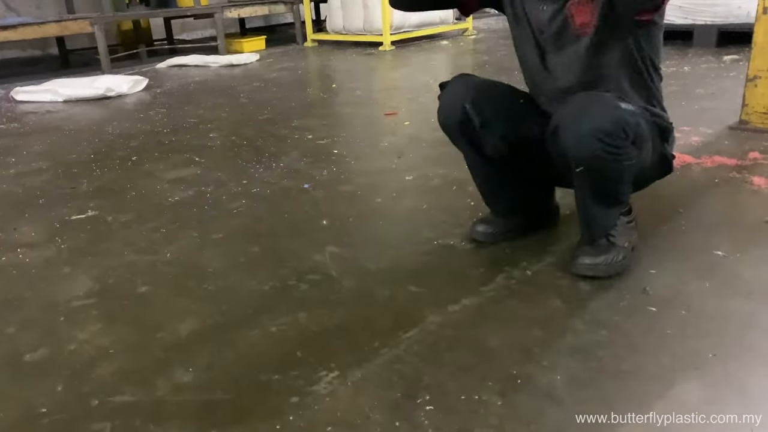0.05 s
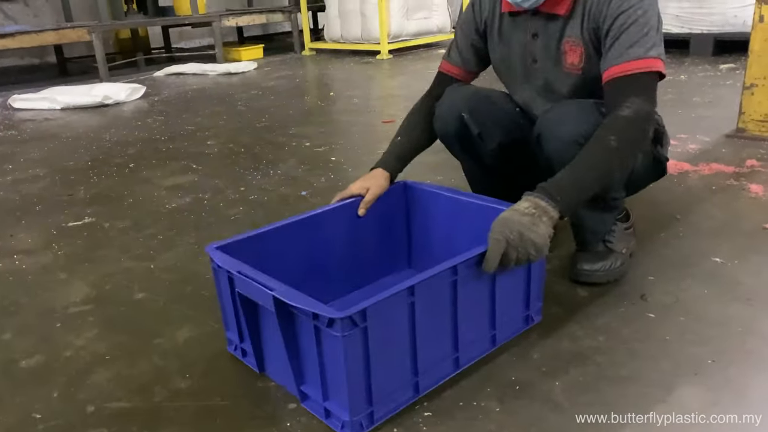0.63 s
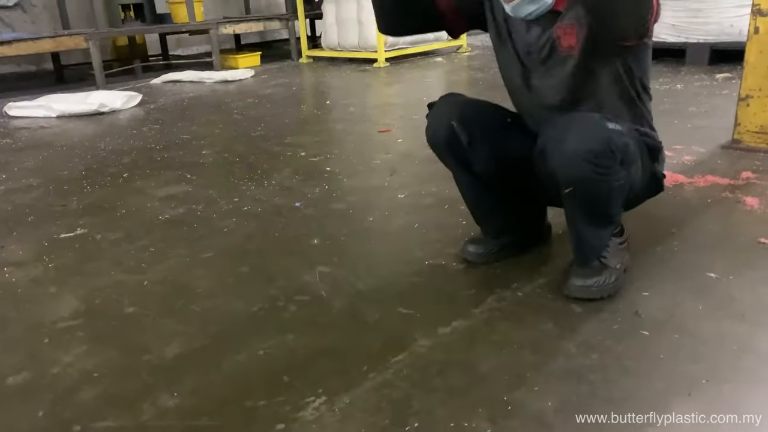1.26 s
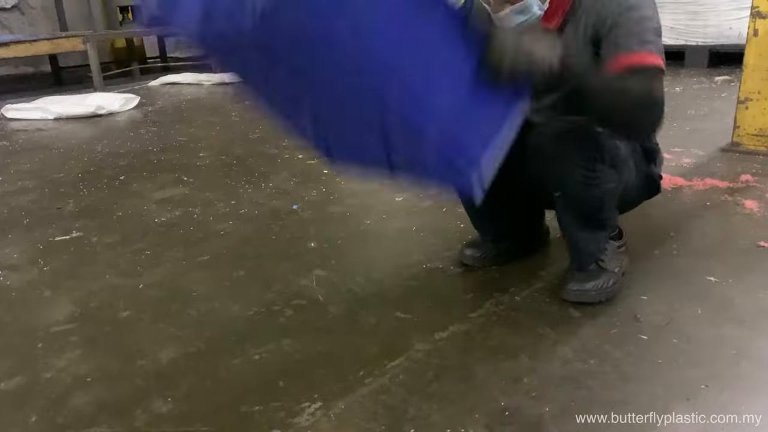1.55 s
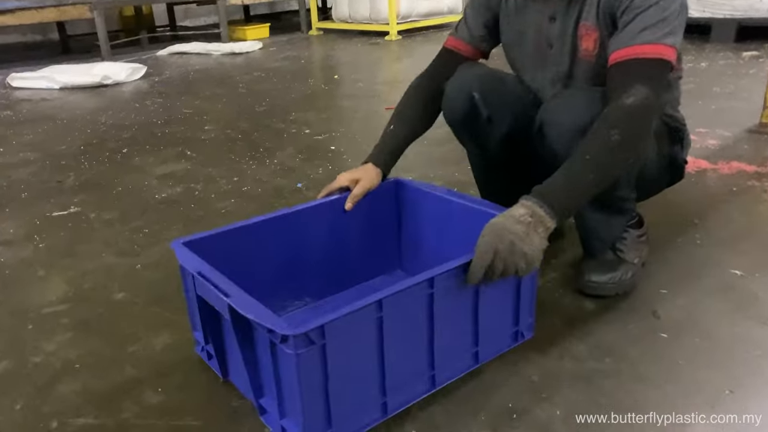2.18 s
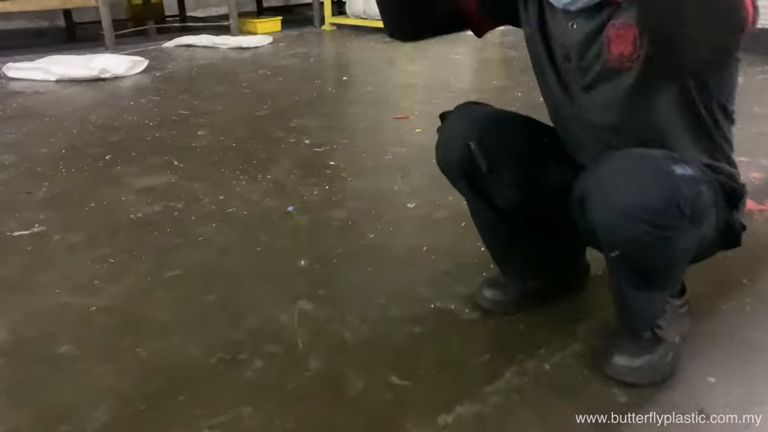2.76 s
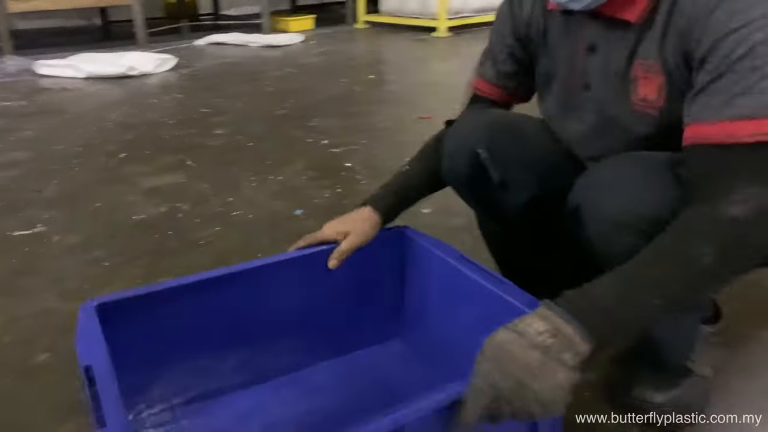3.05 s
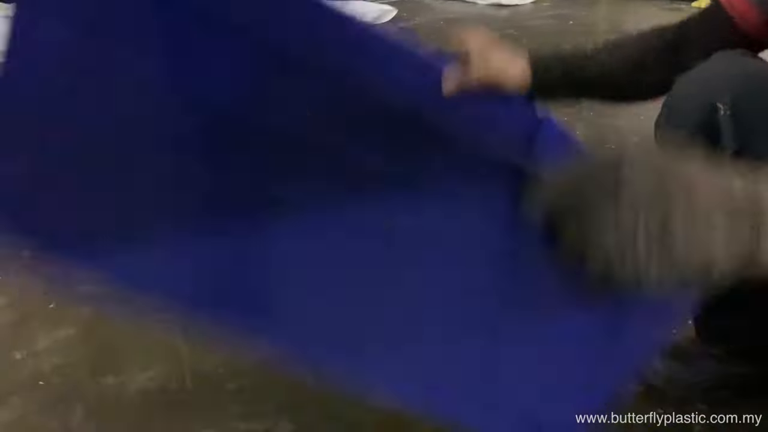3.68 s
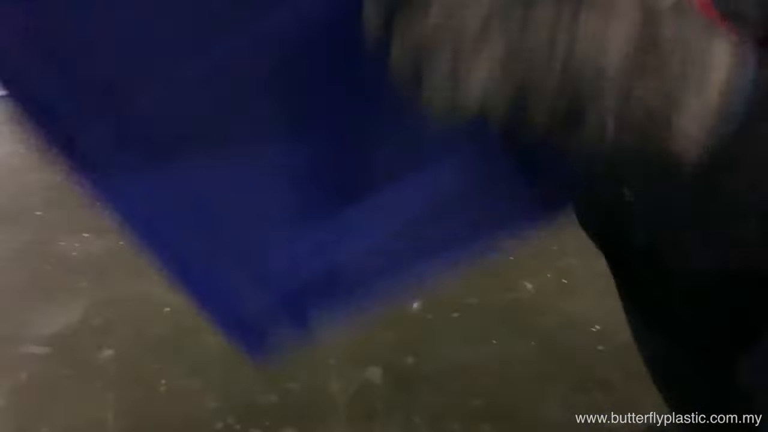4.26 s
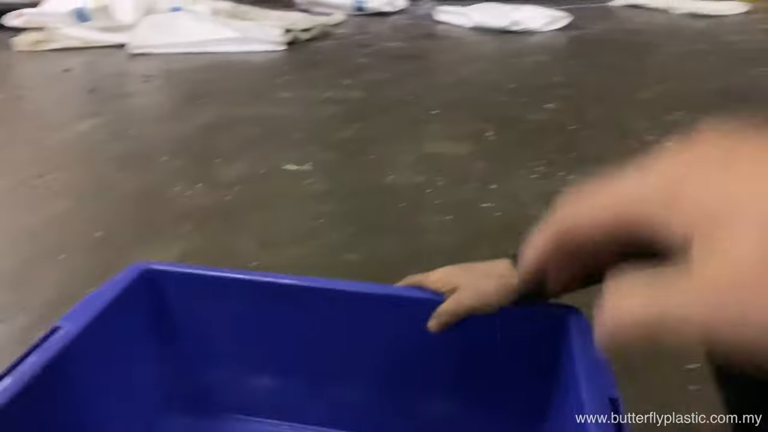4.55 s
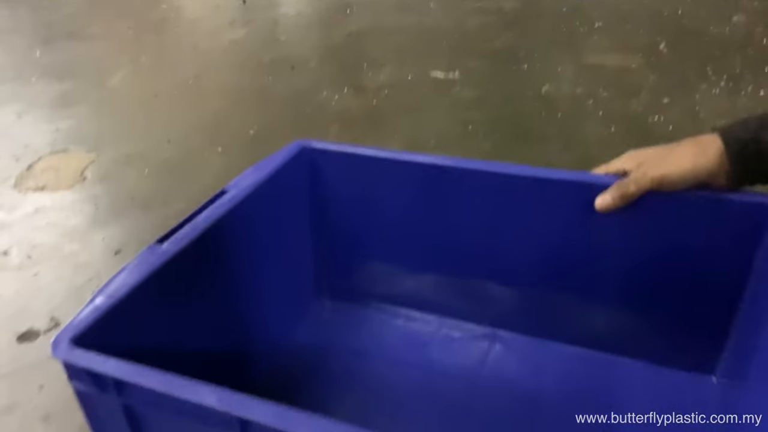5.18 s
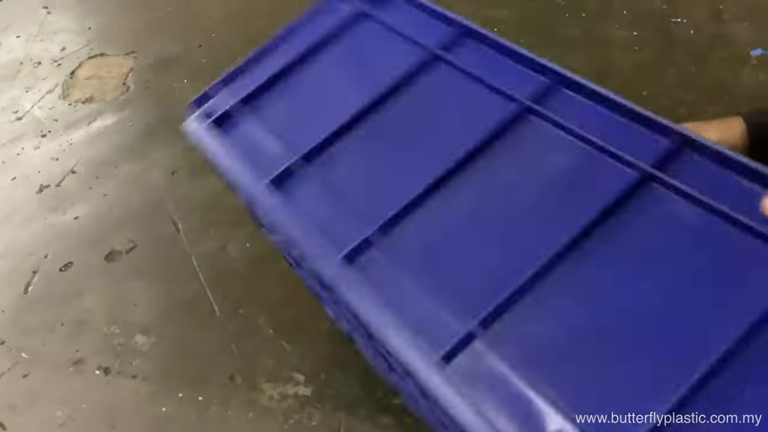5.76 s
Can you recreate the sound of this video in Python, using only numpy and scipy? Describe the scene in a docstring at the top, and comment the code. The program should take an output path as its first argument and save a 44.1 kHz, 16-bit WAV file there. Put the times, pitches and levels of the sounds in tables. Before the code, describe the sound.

A hard, empty plastic crate is slammed onto a concrete warehouse floor four times, close to the microphone, at about 0.4, 1.7, 3.1 and 4.5 seconds. Each slam is loud and abrupt: a sharp crack of the edges, a flat slap of the base and a hollow thump, with a very brief buzz of plastic. The hall rings on after each one and dies away in about a second. The third and fourth slams have more thump and a tiny, immediate bounce, and the fourth is a little lighter and less echoing. At about 5.1 seconds a thin, faint squeal sounds once far across the hall and lingers briefly. From about 5.3 to 5.8 seconds the crate is tipped by hand, with quiet rubbing, small gritty scrapes and several soft, dull bumps. A faint rush and hum of ventilation continues throughout.

```python
"""In a warehouse, a plastic crate is slammed four times on the concrete floor, then tipped up by hand.
Each slam is a quick run of contacts: edges crack, the base slaps flat, trapped air thumps.
A limiter turns each slam down and recovers as the hall dies away.
Ventilation hums in the background, and something squeals once far off."""
import sys
import numpy as np
from scipy import signal
from scipy.fft import rfft, irfft, next_fast_len
from scipy.io import wavfile
from scipy.ndimage import uniform_filter1d, minimum_filter1d

SR = 44100
rng = np.random.default_rng(int(sys.argv[2]) if len(sys.argv) > 2 else 0)


def bounce(signal):
    """Save signal as a 16-bit WAV file at the path given by the first command-line argument."""
    frames = np.transpose(np.atleast_2d(signal))
    limited = np.clip(frames, -1, 1)
    pcm = np.round(limited * 32767).astype(np.int16)
    wavfile.write(sys.argv[1], SR, pcm)


N = 256662
TIME = np.arange(N) / SR

# The crate's modes, the notes it rings at. Each row: pitch in Hz, width in Hz, level in dB.
CRATE_MODES = [(66.4, 8.3, -1.5), (160.5, 7.4, -5), (228.7, 82, 3.5), (267, 18, -16), (350, 29, -1.5),
               (413, 10, -17), (579.7, 79, 10), (584, 120, 10), (613.3, 170, 6), (694, 27, -7),
               (1061.4, 54, -9.5), (1035, 160, -2.5), (1400, 79, -6), (1280, 91, -18), (1540, 34, -1.5),
               (1720, 60, 0), (1970, 36, 2), (2270, 270, -0.6), (2700, 170, -4.5), (2670, 250, 1)]
# Hard plastic cracking on gritty concrete. Each row: frequency in Hz, level in dB.
CRACK_COLOUR = [(200, -4), (900, 22), (2300, 8.5), (3200, -10), (4400, 3), (5500, -24), (7300, -10),
                (8600, -2.5), (10500, -18), (15500, -20)]
# How alike left and right are, for cracks and for the hall. Each row: frequency in Hz, likeness 0 to 1.
CRACK_LIKENESS = [(500, 0.76), (2000, 0.067), (5000, .2), (8500, 0.34), (12000, 1)]
HALL_LIKENESS = [(60, 0.91), (130, .93), (290, 0.83), (640, 0.22), (1300, 0), (2400, 0.00017), (5000, 0.13),
                 (8000, 0.066), (13000, 1)]
# The slams. Each row: start in seconds, seconds to fall flat, force in dB, pitches of corner, wall,
# rim and base in Hz, air puff in dB, its pitch in Hz, snap in dB, its moment as a share of the fall,
# level sent to the hall in dB, extra treble sent there in dB.
SLAMS = [(0.447, .0082, 2.5, 1040, 715, 1400, 310, -10, 57.9, -6, 1, -11, 1.5),
         (1.7098, .0066, 1.5, 955, 700, 1600, 328.3, -14.5, 50, -5.5, 1, -9, 0),
         (3.0922, .0080, -.5, 984, 1219, 1850, 275, 1, 87.4, -8.5, .5, -9, 1.5),
         (4.5311, 0.0085, -3.5, 1450, 612, 2100, 279, 0.5, 141.5, -3.5, 0.49, -13, -5.5)]


def gain_of(db):
    """Turns decibels into a number to multiply by."""
    return 10 ** (np.asarray(db) / 20)


def unit_level(x):
    """Scales a signal to an average (rms) level of one."""
    return x / np.sqrt(np.mean(x ** 2) + 1e-20)


def look_up(points, hz):
    """Reads between a table's rows, with octaves evenly spaced."""
    row_hz, value = np.transpose(points)
    return np.interp(np.log(hz + 1), np.log(row_hz + 1), value)


def add(mix, start, sound):
    """Mixes a sound in at a start time in seconds."""
    part = mix[..., round(start * SR):][..., :sound.shape[-1]]
    part += sound[..., :part.shape[-1]]


def noise_pair(colour, likeness):
    """Left and right noise, partly alike; colour is its level at each frequency."""
    n = next_fast_len(N, True)
    hz = np.fft.rfftfreq(n, 1 / SR)
    left, other = rfft(rng.standard_normal((2, n)))
    same = np.clip(look_up(likeness, hz), -1, 1)
    right = same * left + np.sqrt(1 - same ** 2) * other
    return unit_level(irfft(np.array([left, right]) * gain_of(look_up(colour, hz)), n)[:, :N])


def ventilation(air_db=-62, hum_hz=102, hum_db=-70, waver=0.14):
    """Moving air rushes softly and a motor gives a wavering hum."""
    # The rush of air. Each row: frequency in Hz, level in dB.
    air_colour = [(15, -44), (25, -22), (102, -5), (161, -18.5), (242, -9), (270, -20), (309, -9),
                  (405, -22.5), (439, -11.5), (695, -15.5), (818, -16.5), (1560, -21.5), (1790, -19.5),
                  (12500, -46), (16000, -68)]
    sway = unit_level(uniform_filter1d(uniform_filter1d(rng.standard_normal(N), 4000), 4000))
    hum = gain_of(hum_db) * np.sqrt(2) * (1 + waver * sway) * np.sin(2 * np.pi * hum_hz * TIME)
    opening_db = 6 * np.exp(-TIME / .15)  # a little louder at first
    return gain_of(air_db + opening_db) * noise_pair(air_colour, HALL_LIKENESS) + hum


def squeal(start=5.08, length_s=0.27, hz=1610, db=-60, waver=0.0058, linger_s=0.21, linger_db=-2):
    """A thin squeal from far across the hall lingers after it stops."""
    n, out = int(length_s * SR), np.zeros((2, N))
    drift = unit_level(uniform_filter1d(rng.standard_normal(N), 1500))[:n]
    phase = 2 * np.pi * np.cumsum(hz * (1 + waver * drift)) / SR
    tone = gain_of(db) * np.sqrt(signal.windows.hann(n)) * np.sin(phase)
    paths = rng.standard_normal((2, SR)) * np.exp(-TIME[:SR] / linger_s)
    tail = signal.fftconvolve(tone[None], paths / np.linalg.norm(paths[0]), axes=1)
    add(out, start, tone)
    add(out, start, gain_of(linger_db) * tail)
    return out


def mottled(x, patchy_db=2.5, flutter_db=0.2):
    """Reflections add up and cancel in patches of pitch and time."""
    spectra = signal.stft(np.float32(x), nperseg=1024)[2]
    shape = spectra.shape[1:]  # frequency by time
    patches = uniform_filter1d(rng.standard_normal(shape), 3, axis=0)
    patches = unit_level(uniform_filter1d(patches, 14, axis=1))
    flutter = unit_level(uniform_filter1d(rng.standard_normal(shape), 24, axis=0))
    uneven = spectra * gain_of(patchy_db * patches + flutter_db * flutter)
    return unit_level(signal.istft(uneven, nperseg=1024)[1][:, :N])


def crate_colour(hz, between_db=-4):
    """The crate gives off most sound at its modes and less between them."""
    peaks = sum(gain_of(db) ** 2 / (1 + (2 * (hz - pitch) / width) ** 2)
                for pitch, width, db in CRATE_MODES)
    return np.sqrt(gain_of(between_db) ** 2 + .5 * peaks)


def ring_on(x, colour, fade_times, build_up_s):
    """Countless modes store the energy of each octave and give it back as dying noise."""
    n = next_fast_len(N, True)
    hz, centres = np.fft.rfftfreq(n, 1 / SR), 62.5 * 2. ** np.arange(9)
    octave = np.interp(np.log(hz + 1), np.log(centres), np.arange(len(centres)))
    white = noise_pair([(20, 0), (SR / 2, 0)], HALL_LIKENESS)
    wash = rfft(mottled(white), n) * gain_of(look_up(colour, hz)) * crate_colour(hz)
    low_cut = hz ** 2 / (hz ** 2 + 120 ** 2)  # the deep puff of air stays near the crate
    drive, out = rfft(x[1], n) * low_cut, np.zeros((2, n))
    for k, centre in enumerate(centres):
        band = np.maximum(1 - abs(octave - k), 0)
        power = irfft(drive * band, n) ** 2 / np.mean(band ** 2)
        decay_s = look_up(fade_times, centre) / np.log(10 ** 6)  # 60 dB is a millionfold in power
        for seconds in (build_up_s, decay_s):
            keep = np.exp(-1 / (seconds * SR))
            power = signal.lfilter([1 - keep], [1, -keep], power)
        out += np.sqrt(power) * irfft(wash * band, n)
    return out[:, :N]


def into_hall(x, treble_hz=1700):
    """The crate sends the hall a weaker, duller sound when it is near and faces the listener."""
    starts, *_, hall_db, treble_db = np.transpose(SLAMS)
    body = signal.sosfilt(signal.butter(1, treble_hz, fs=SR, output="sos"), x)
    treble = gain_of(np.interp(TIME, starts, treble_db)) * (x - body)
    return gain_of(np.interp(TIME, starts, hall_db)) * (body + treble)


def echoes(x, band_hz=(170, 1000)):
    """The roof and far wall throw back single dull echoes."""
    # The echoes. Each row: delay in seconds, level in dB.
    reflections = [(0.035, -15), (.047, -11.5), (.205, -21)]
    dull = signal.sosfilt(signal.butter(2, band_hz, "band", fs=SR, output="sos"), x)
    out = np.zeros((2, N))
    for delay, db in reflections:
        add(out, delay, gain_of(db) * dull)
    return out


def hall(x, far_delay_s=0.11, far_db=-18):
    """The hall rings on, fed again by sound scattered back from its far end."""
    # The hall's tone. Each row: frequency in Hz, level in dB.
    colour = [(50, -20), (100, -4.5), (165, -2.5), (220, -7.5), (310, 2.5), (430, -7), (600, -7), (800, -4),
              (1050, 0.5), (1600, 0.5), (2700, 0.5), (4500, 6), (8000, 1.5), (15000, -1)]
    # How long it rings. Each row: frequency in Hz, seconds to fade by 60 dB.
    fade_times = [(80, 0.56), (280, 1.156), (600, 1.026), (1500, 1), (4000, 1.04), (8000, 0.78),
                  (14000, 0.18)]
    far_end = np.zeros((2, N))
    add(far_end, far_delay_s, gain_of(far_db) * x)
    return ring_on(x + far_end, colour, fade_times, build_up_s=0.0035) + echoes(x)


def ribs(x):
    """The crate's ribs and panels buzz briefly with many close-set modes."""
    # The buzz's tone. Each row: frequency in Hz, level in dB.
    colour = [(60, -15.5), (150, -13), (350, 0), (700, -13), (1500, -5), (4000, 0), (12000, -6.5)]
    # How long it lasts. Each row: frequency in Hz, seconds to fade by 60 dB.
    fade_times = [(70, .07), (200, 0.069), (500, 0.16), (2000, 0.091), (10000, 0.2)]
    return ring_on(x, colour, fade_times, build_up_s=.003)


def flex(hz, swings, late_s=0):
    """A pushed panel springs back and settles; swings counts the cycles up to its strongest."""
    turns = hz * np.maximum(TIME[:SR // 5] - late_s, 0)
    return turns / swings * np.exp(1 - turns / swings) * np.sin(2 * np.pi * turns)


def flex_pair(hz, swings, left_late_s=.00024):
    """The crate is nearer the right, so a flex reaches the left later."""
    return np.array([flex(hz, swings, left_late_s), flex(hz, swings)])


def handling():
    """Hands bump and drag the crate as they tip it: the base rubs and grit scrapes under its edge."""
    # Bumps of the hands. Each row: start in seconds, level in dB, pitch in Hz.
    nudges = [(5.517, -49, 273), (5.624, -52, 266), (5.676, -46, 300), (5.709, -53, 280),
              (5.731, -51, 124.6), (5.785, -48.5, 110)]
    # Short pulls. Each row: start in seconds, length in seconds, rub in dB, grit in dB.
    drags = [(5.308, .08, -59, -61), (5.406, 0.091, -56, -69.5), (5.573, .015, -66, -61.5),
             (5.61, 0.047, -52.5, -80), (5.657, .14, -53.5, -73)]
    # The base rubbing on the floor. Each row: frequency in Hz, level in dB.
    rub_colour = [(60, -11), (150, -3.5), (215, -22), (275, 5.5), (330, -30), (450, -32), (560, -20.5),
                  (900, -43), (3000, -37.5), (12000, -46.5)]
    bumps, rub, scrape = np.zeros((2, N)), np.zeros(N), np.zeros(N)
    for start, db, hz in nudges:
        add(bumps, start, gain_of(db) * flex(hz, swings=0.69))
    for start, length, rub_db, grit_db in drags:
        pull = signal.windows.tukey(int(length * SR), .5)
        add(rub, start, gain_of(rub_db) * pull)
        add(scrape, start, gain_of(grit_db) * pull)
    grains_db = 3.0 * np.repeat(rng.exponential(1, N // 32 + 1), 32)[:N]
    grit = scrape * unit_level(gain_of(grains_db)) * noise_pair(CRACK_COLOUR, CRACK_LIKENESS)
    return bumps + grit + rub * noise_pair(rub_colour, HALL_LIKENESS)


def crate(push, ring_db=-3.0):
    """A push is heard directly and rings the crate's modes, neighbours swinging opposite ways."""
    t, ring = TIME[:SR // 3], np.zeros(SR // 3)
    for k, (hz, width, db) in enumerate(CRATE_MODES):
        strength = (-1) ** k * gain_of(db) * 2 * np.pi * width / SR
        ring += strength * np.exp(-np.pi * width * t) * np.sin(2 * np.pi * hz * t)
    return push + gain_of(ring_db) * signal.oaconvolve(push, ring[None], axes=1)[:, :N]


def contacts(start, fall, corner_hz, wall_hz, rim_hz, base_hz):
    """A faint tick leads in; the crate lands on a corner and rocks flat."""
    # Each row: time in seconds, pitch in Hz, push in dB, swings, crack in dB.
    return [(start - 0.0046, corner_hz, -13.5, 2.1, -26),
            (start, corner_hz, 4.5, 2.1, -8),
            (start + .31 * fall, wall_hz, 5.8, 0.57, -5),
            (start + fall, rim_hz, 5.8, 0.42, 1.5),
            (start + fall, base_hz, 6.7, .6, -17)]


def slams(crack_decay_s=0.005, snap_decay_s=0.0027, puff_lag_s=0.0057, left_db=-0.5):
    """Each contact flexes a panel and cracks; the hardest edge snaps and trapped air thumps."""
    # The bright snap of that edge. Each row: frequency in Hz, level in dB.
    snap_colour = [(1500, -13), (3000, -15.5), (5000, -9), (6800, -2), (8600, 1), (11000, -4), (15500, -9)]
    # The crate drops back on its base. Each row: start in seconds, level in dB, pitch in Hz.
    bounces = [(3.112, 3, 580), (3.133, -4.5, 270), (4.558, -7, 182)]
    push, burst, snap, t = np.zeros((2, N)), np.zeros(N), np.zeros(N), TIME[:SR // 5]
    for start, fall, force_db, *pitches, puff_db, puff_hz, snap_db, snap_share, _, _ in SLAMS:
        for when, hz, push_db, swings, crack_db in contacts(start, fall, *pitches):
            add(push, when, gain_of(force_db + push_db) * flex_pair(hz, swings))
            add(burst, when, gain_of(force_db + crack_db) * np.exp(-t / crack_decay_s))
        # Once down, the base bulges and squeezes the air out.
        puff = gain_of(force_db + puff_db) * flex_pair(puff_hz, swings=0.34)
        add(push, start + fall + puff_lag_s, puff)
        add(snap, start + snap_share * fall, gain_of(force_db + snap_db) * np.exp(-t / snap_decay_s))
    for start, db, hz in bounces:
        add(push, start, gain_of(db) * flex_pair(hz, swings=0.48))
    cracks = burst * noise_pair(CRACK_COLOUR, CRACK_LIKENESS)
    balance = gain_of([[left_db], [0]])
    return crate((push + cracks) * balance) + snap * noise_pair(snap_colour, CRACK_LIKENESS)


def scene():
    """The crate close by, its ribs buzzing, and the warehouse around it."""
    blows = slams() + handling()
    return blows + ribs(blows) + hall(into_hall(blows)) + squeal() + ventilation()


def record(dry, limit_db=-8.0, recovery_db_per_s=58, hold_s=.016, low_hz=25, top_hz=16100):
    """Cuts rumble, turns loud moments down with a limiter, rounds peaks and cuts the highest treble."""
    dry = signal.sosfilt(signal.butter(2, low_hz, "high", fs=SR, output="sos"), dry)
    power = abs(uniform_filter1d((dry ** 2).mean(0), 265))
    over_db = np.maximum(10 * np.log10(power + 1e-12) - limit_db, 0)
    span = 2 * int(hold_s * SR / 2) + 1
    held_db = -minimum_filter1d(-over_db, span, origin=span // 2)
    ramp_db = TIME * recovery_db_per_s
    cut_db = np.maximum.accumulate(held_db + ramp_db) - ramp_db  # grabs fast, lets go slowly
    limited = dry / gain_of(uniform_filter1d(cut_db, 65))
    rounded = limited / (1 + (limited / .85) ** 8) ** (1 / 8)
    treble_cut = signal.firwin(511, top_hz, window=("kaiser", 9), fs=SR)
    return signal.oaconvolve(rounded, treble_cut[None], "same")


dry = scene()
out = record(dry)
bounce(out)
```